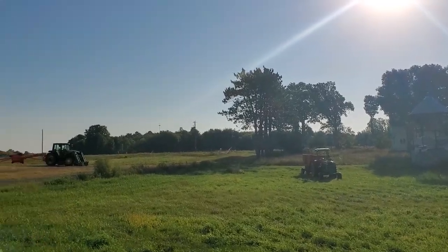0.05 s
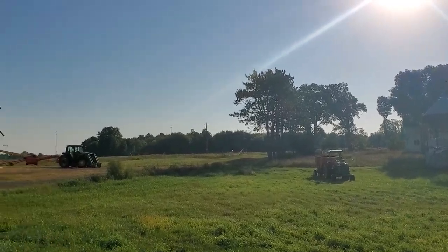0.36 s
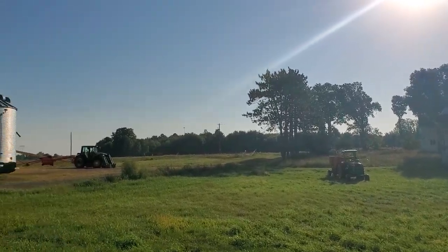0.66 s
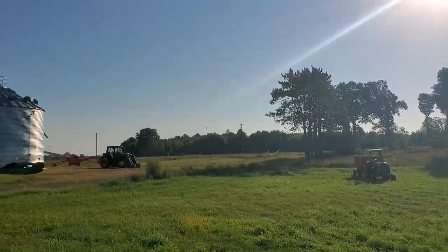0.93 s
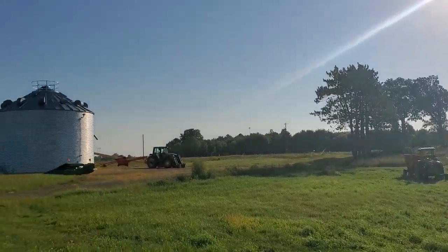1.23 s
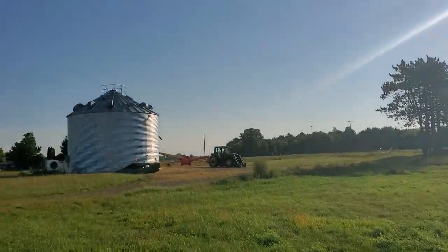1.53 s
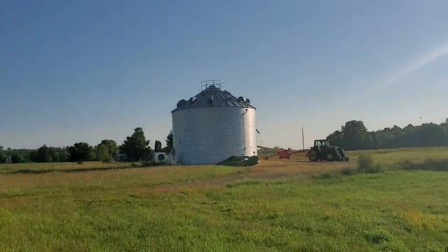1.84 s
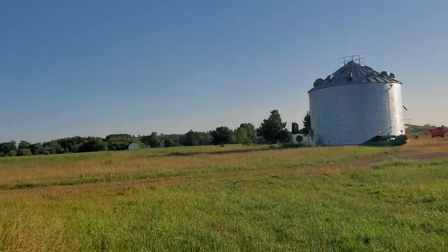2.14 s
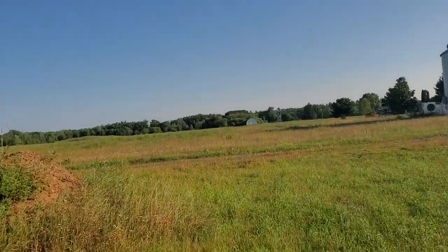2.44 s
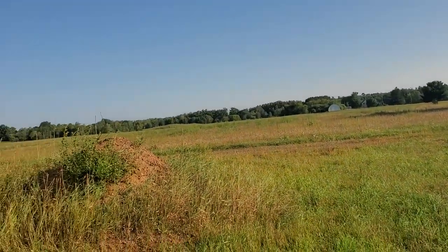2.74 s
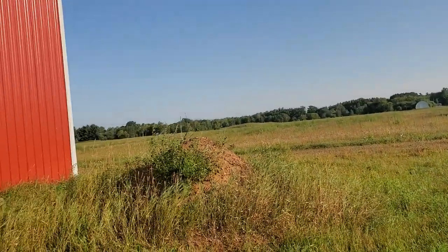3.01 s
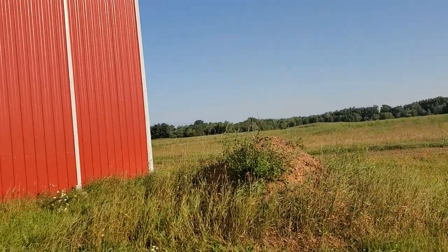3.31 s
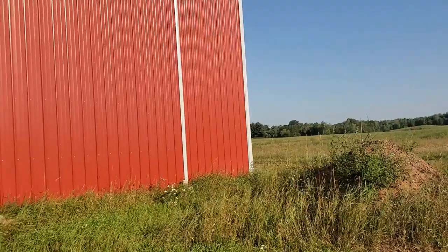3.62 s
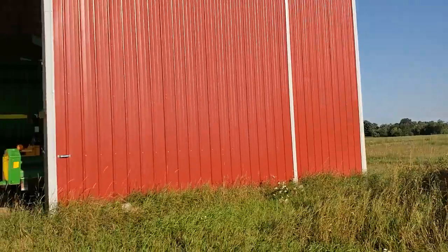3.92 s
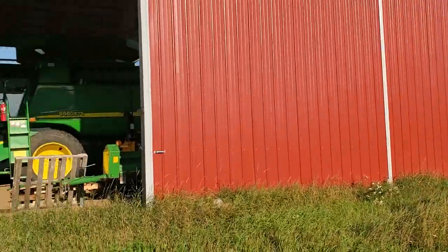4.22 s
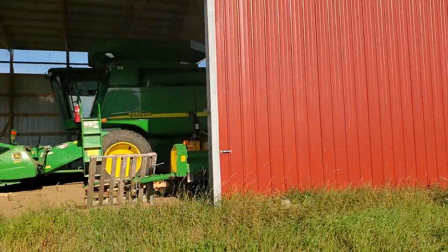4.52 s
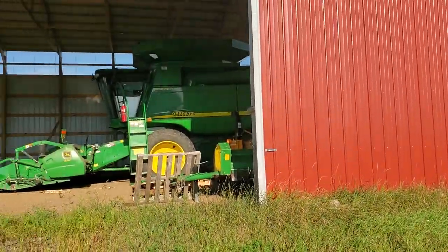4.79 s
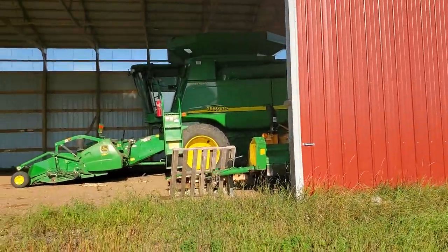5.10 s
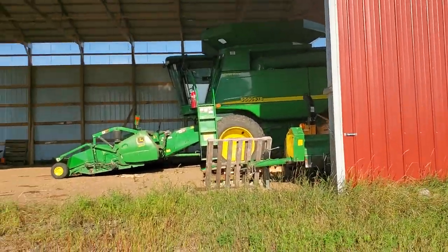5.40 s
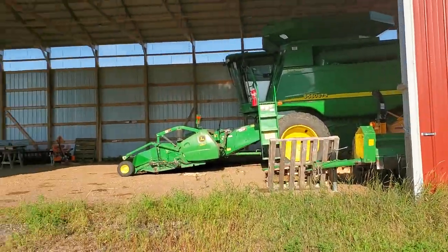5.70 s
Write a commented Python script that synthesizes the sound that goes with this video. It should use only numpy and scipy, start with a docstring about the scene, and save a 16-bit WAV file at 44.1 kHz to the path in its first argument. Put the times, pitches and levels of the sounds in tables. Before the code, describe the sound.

Crickets trill and katydids sizzle quietly across a summer field while wind buffets the microphone in short, deep bursts, the loudest sound here. During a lull, someone can be heard walking slowly through grass, with soft thuds, brushing blades and snapping stems. A twig splits underfoot and the wind picks up again. A faint drone like distant traffic lies behind it all.

```python
"""Gusts of wind rumble and thump as their eddies tumble over a phone's two microphone ports.
Whoever holds it walks slowly through summer grass on a farm: blades swish, stems crunch, a twig splits.
Crickets and katydids sing all around by stridulation, drawing a scraper over a toothed file on the wing.
Behind them lie the faint murmur of open country, a far drone and a thin, fading whine."""
import sys
import numpy as np
from scipy import signal
from scipy.fft import rfft, irfft, next_fast_len
from scipy.io import wavfile
from scipy.ndimage import uniform_filter1d

SR = 44100
rng = np.random.default_rng(int(sys.argv[2]) if len(sys.argv) > 2 else 0)


def inscribe(sig):
    """Save sig as 16-bit PCM at rate SR to the path in sys.argv[1].

    A 1-D sig is mono; a 2-D sig holds one channel per row.
    Samples are clipped to [-1, 1] before scaling.
    """
    pcm = np.round(np.clip(np.atleast_2d(sig).T, -1, 1) * 32767)
    wavfile.write(sys.argv[1], SR, pcm.astype(np.int16))


N = 262395
TIME = np.arange(N) / SR

# Gusts. Each row: arrival in seconds, hold in seconds, relative rumble level in dB,
# flutter relative to rumble in dB, left minus right rumble in dB.
GUSTS = [(0.107, .06, -50.5, 0.5, -30), (0.193, 0.024, -33.5, -.5, -5), (0.304, .25, -40, -3, -1),
         (.6, 0.03, -34.5, -11.5, 2.5), (0.674, 0.094, -38.5, -0.5, 2), (0.822, 0.098, -32.5, -11.5, 1.5),
         (0.946, .035, -36, 2, 0), (1.109, 0.13, -39.5, -11, -10), (1.36, 0.089, -44, -16, 0),
         (1.502, 0.15, -62.5, -14, -16.5), (1.889, 0.065, -56.5, -5.5, -24.5),
         (2.003, 0.033, -43, -12.5, -1), (2.124, 0.017, -45, -13, -7.5), (2.324, 0.064, -59, -26, 3),
         (2.47, 0.17, -64.5, -18, 17), (2.696, 0.24, -65.5, -17, -21), (2.996, 0.069, -56.5, -7.5, -30.5),
         (3.143, .055, -35, -5, -6), (3.231, 0.19, -40, -4, -10), (3.466, 0.064, -37, -7, -11),
         (3.611, 0.17, -47, -7.5, -21.5), (3.743, 0.23, -34.5, -9.5, 0.5), (4.064, 0.1, -33, -6.5, 1),
         (4.159, 0.091, -37.5, -3, 12), (4.328, .2, -35, -10, 1.5), (4.597, .045, -35.5, -7, 0),
         (4.685, .19, -53, -7, -19.5), (4.95, 0.15, -43, -13.5, -4), (5.155, 0.079, -35, -13.5, 5),
         (5.317, 0.1, -43.5, -10.5, -4.5), (5.555, 0.016, -46.5, -11, -7),
         (5.661, 0.17, -52.5, -10.5, -17.5), (5.813, 0.15, -40.5, -12, 0.5)]
# Spectra of large, middling and fine eddies. Each row: frequency in Hz, relative level in dB.
RUMBLE_SPECTRUM = [(10, -35), (25, -13.5), (45, -0.5), (70, 3), (100, -1), (140, -10), (200, -19),
                   (350, -39), (700, -69)]
FLUTTER_SPECTRUM = [(60, -12.5), (140, -3), (220, -2), (310, -3.5), (420, -14.5), (550, -24.5), (750, -44),
                    (1300, -67), (3000, -70), (8000, -95)]
FINE_SPECTRUM = [(150, -17), (330, 5), (440, 1.5), (560, -8.5), (700, -16.5), (900, -28), (1500, -45),
                 (3000, -60), (8000, -90)]
# Single large eddies. Each row: time in seconds, relative peak in dB, pitch in Hz.
BUFFETS = [(0.195, -20.5, 88), (0.471, -23, 160), (0.747, -19, 172), (0.907, -20, 89.6), (0.97, -25, 85.5),
           (1.119, -27.5, 277), (3.138, -25, 260), (3.398, -26.5, 306), (3.777, -17, 76.5),
           (3.925, -18.5, 86.5), (4.125, -20.5, 59.2), (4.449, -20.5, 119), (5.152, -22, 68),
           (5.21, -26.5, 51.1)]

# Steps. Each row: footfall, length of swing and time under load in seconds,
# then relative levels of crunch and hiss in dB.
STEPS = [(2.028, 0.14, 0.064, -57.5, -66), (2.54, 0.03, 0.039, -68.5, -71.5),
         (3.243, .01, 0.027, -55, -63.5), (3.75, .08, 0.15, -73.5, -79), (4.21, 0.069, 0.026, -75, -70),
         (4.54, .08, 0.044, -70.5, -71.5), (5.14, 0.23, 0.12, -61, -69), (5.375, .05, .1, -60.5, -85),
         (5.72, .05, 0.052, -64, -93), (5.86, 0.08, 0.12, -58.5, -64)]
# Grass stirring around the legs, most in the tall patch. Each row: time in seconds, relative level in dB.
GRASS_STIR = [(0, -79), (1.7, -81.5), (2.3, -85), (2.75, -81), (3.5, -75.5), (4.7, -77.5), (5.6, -77)]
# Spectra of crushed stems and brushed blades. Each row: frequency in Hz, relative level in dB.
STEM_SPECTRUM = [(200, -2.5), (540, 13.5), (820, -5.5), (1250, 5.5), (1700, 3), (2400, -5.5), (3200, -10),
                 (4200, -12.5), (7000, -19), (12000, -38)]
BLADE_SPECTRUM = [(1000, 11.4), (2500, 7.3), (4000, 6.7), (6000, 8.8), (9000, 6.8), (11000, 5.5),
                  (13000, 7.3), (16000, 8.3)]
# Soles meeting turf. Each row: start in seconds, peak in dB, pitch in Hz, decay time in seconds.
LANDINGS = [(2.032, -44, 700, 0.011), (2.046, -40.5, 590, 0.016), (2.541, -45, 590, 0.008),
            (2.566, -44.5, 606, 0.0076), (3.132, -35, 520, 0.0068), (3.185, -39, 490, 0.006),
            (5.13, -36.5, 490, 0.009), (5.149, -43, 520, 0.075)]
# Breaking stems. Each row: start in seconds, relative peak in dB, nominal pitch in Hz.
STEM_SNAPS = [(1.8354, -54.5, 960), (2.036, -46, 1180), (2.0609, -48, 1400), (2.0938, -49, 1070),
              (2.5265, -51.5, 1060), (2.5804, -47.5, 980), (3.1337, -51.5, 1400), (3.273, -55, 1380),
              (3.752, -57, 1330), (4.2167, -53.5, 1040), (4.515, -59, 1100), (5.327, -53, 1200),
              (5.3828, -49, 1420), (5.4381, -52, 1410), (5.4752, -55, 1750), (5.571, -48, 1310),
              (5.723, -59, 1650)]
# Stages of a twig's fracture. Each row: start in seconds, relative peak in dB.
TWIG_SPLITS = [(3.2385, -39), (3.2405, -40), (3.2425, -37), (3.245, -37)]
# The twig's modes. Each row: frequency in Hz, relative level in dB, seconds to decay by 60 dB.
TWIG_MODES = [(1420, -3, .012), (1880, 5, 0.012), (2310, -2, 0.021), (3000, -5.5, 0.013), (5030, -20, .003),
              (6600, -4, 0.0034), (8500, -9, 0.0041)]

# Trilling crickets. Each row: start in seconds, strokes per second, pitch in Hz,
# level relative to the nearest in dB, left minus right in dB.
TRILLS = [(.034, 12.54, 6020, 0, 2), (.026, 13.0, 6740, -2.5, 0), (.02, 15.5, 7330, -5, 1)]
# Chirps. Each row: start in seconds, pitch in Hz, relative level in dB.
CHIRPS = [(0.29, 4860, -67), (.65, 4920, -69), (1.109, 4880, -66), (1.245, 5450, -74), (1.6, 4900, -67.5),
          (2.055, 4890, -66.5), (2.529, 4900, -75), (2.94, 4950, -68), (4.68, 4900, -70)]
# A chirp's partials. Each row: multiple of the pitch, relative level in dB, left minus right in dB.
CHIRP_PARTIALS = [(1, -8, 13), (2, -13, -13)]
# Spectra of the insect choruses. Each row: frequency in Hz, relative level in dB.
FAR_CRICKET_SPECTRUM = [(4500, -27), (5400, -8), (6000, -5), (6600, -1.5), (7250, -1.5), (7700, -4),
                        (8200, -10.5), (8800, -30), (10500, -55)]
FIELD_CRICKET_SPECTRUM = [(3800, -18), (4300, -5.5), (4850, 5), (5100, 5), (5400, -9.5), (6200, -17.5)]
KATYDID_SPECTRUM = [(10000, -38), (12700, -31), (13300, -6), (14000, -5), (15000, -3), (16000, -5)]
# Choruses as the phone turns. Each row: time in seconds, relative level in dB, leftward bias in dB.
FAR_CRICKET_COURSE = [(0.1, -71, 5), (0.3, -68, 5.5), (2.51, -72.5, 2), (2.85, -73, 5), (3.28, -68.5, 3),
                      (3.84, -68, 13.0), (5.04, -70, 19), (5.75, -71, 19)]
KATYDID_COURSE = [(0.1, -69, 2.0), (0.65, -66, 1.5), (1.07, -71.5, 3.6), (1.66, -74, 1.5), (1.89, -76, 4.5),
                  (2.29, -75, 0.5), (3.7, -72, 2.0), (4.29, -70.5, 23), (5.75, -76, 13)]

# A far drone, like traffic. Each row: time in seconds, relative level in dB.
DRONE_COURSE = [(0, -59.5), (1.3, -60), (1.7, -54.5), (2.0, -55.5), (2.3, -80), (2.9, -63), (3.6, -58.5),
                (5.95, -91)]
# Background spectra. Each row: frequency in Hz, relative level in dB.
MURMUR_SPECTRUM = [(20, -12), (70, -9), (160, -21), (300, 3.5), (500, 3), (780, -8.5), (1050, -6),
                   (1500, -12.5), (2200, -21.5), (4000, -29), (9000, -21), (11000, -30.5), (16000, -28)]
DRONE_SPECTRUM = [(250, -26), (400, -2.5), (510, 3), (600, -3), (750, -9.0), (1100, -25.5), (2000, -34)]
WHINE_SPECTRUM = [(900, -28), (965, -14), (985, -29), (1005, 28), (1070, -31)]


def wind(breeze_db=-74.5, gust_db=-45, steepness=0.28):
    """Turbulent pressure: the finest eddies grow fastest, so strong gusts sound brighter."""
    large_power = (undb(breeze_db) * pan(-14.5)) ** 2  # light air reaches mainly the right port
    middle_power = 0
    for start, hold, db, flutter_db, side_db in GUSTS:
        power = swell(start, hold, rise_db_per_s=446, fall_db_per_s=385) ** 2
        large_power = large_power + power * (undb(db) * pan(side_db)) ** 2
        middle_power += power * (undb(db + flutter_db) * pan(0.094 * side_db - 1.3)) ** 2
    fine_power = middle_power * (middle_power / undb(gust_db) ** 2) ** steepness
    rumble = turbulence(RUMBLE_SPECTRUM, shared=0.22, patchy_db=4.0, rate=45) * np.sqrt(large_power)
    flutter = turbulence(FLUTTER_SPECTRUM, shared=0.11, patchy_db=5.0, rate=70) * np.sqrt(middle_power)
    fine = turbulence(FINE_SPECTRUM, shared=0.26, patchy_db=5.5, rate=80) * np.sqrt(fine_power)
    return rumble * undb(0.2) + flutter * undb(0.78) + fine * undb(-7.5)


def turbulence(spectrum, shared, patchy_db, rate):
    """Intermittency: eddies come in clumps, partly different at each port, while mean power holds."""
    clumps = wander(rate) + np.array([wander(rate), wander(rate)])
    eddies = colour(noise_pair(shared) * undb(patchy_db * clumps), spectrum)
    power = uniform_filter1d(np.mean(eddies ** 2, axis=0), size=3500)
    return eddies / np.sqrt(power + 1e-6)


def buffets(width_cycles=0.82, stagger_s=0.0022):
    """Convection: a passing eddy pushes and then sucks, reaching one port just before the other."""
    out = np.zeros((2, N))
    t = np.arange(-SR // 40, SR // 40) / SR
    for when, db, hz in BUFFETS:
        delays = stagger_s * rng.standard_normal((2, 1))
        phase, side = rng.standard_normal(2)
        cycles = hz * (t - delays)
        pressure = np.sin(2 * np.pi * cycles + phase) * np.exp(-(cycles / width_cycles) ** 2)
        add(out, when + t[0] + 0.0037, pressure * undb(db - 4) * pan(4.1 * side))
    return out


def footsteps(swing_rise_db=12.5, slide_share=0.22):
    """Friction and buckling: each foot brushes hissing blades, then crushes a mat of stems."""
    press, brush = 0, 0
    for when, swing, load, crunch_db, hiss_db in STEPS:
        # stems take the weight quickly and spring back slowly
        press += swell(when, load, rise_db_per_s=593, fall_db_per_s=145) * undb(crunch_db)
        brush += swell(when, slide_share * load, swing_rise_db / swing, fall_db_per_s=85) * undb(hiss_db)
    stems = (crackle(rate=1200, spread_db=3.5) + 0.25 * noise_pair(0.066)) * undb(2.1 * wander(130))
    crunch = colour(stems, STEM_SPECTRUM) * press * undb(-1) * pan(1.1)
    blades = (crackle(rate=2500, spread_db=2.0) + noise_pair(0)) * undb(wander(40))
    stir = undb(curves(GRASS_STIR)[0])
    hiss = colour(blades, BLADE_SPECTRUM) * np.hypot(brush, stir) * undb(4) * pan(5.5)
    return crunch + hiss


def crackle(rate, spread_db):
    """A Poisson process: stems click independently, a few louder than the rest, each from its own side."""
    hits = rng.random(N) < rate / SR
    sizes = undb(spread_db * np.minimum(rng.exponential(size=N), 3))
    signs = rng.choice([-1, 1], N)
    return unit(hits * sizes * signs * pan(6 * rng.standard_normal(N)))


def landings():
    """Damped impact: soles scuff dully onto the turf."""
    out = np.zeros((2, N))
    for start, db, hz, decay_s in LANDINGS:
        add(out, start, fibre_burst(hz, width=0.65, decay_s=decay_s, apart=0.44) * undb(db))
    return out


def stem_snaps():
    """Brittle fracture: single dry stems break with a short woody crack."""
    out = np.zeros((2, N))
    for start, db, hz in STEM_SNAPS:
        crack = fibre_burst(.92 * hz, width=.72, decay_s=.0035, apart=.7)
        add(out, start, crack * undb(db + 2) * pan(2.5))
    return out


def fibre_burst(hz, width, decay_s, apart):
    """Exponential decay: yielding fibres give a dying band of noise around one pitch, with peak 1."""
    t = np.arange(SR // 4) / SR
    fibres = rng.standard_normal(len(t)) + apart * rng.standard_normal((2, len(t)))
    band = signal.butter(3, [hz / (1 + width), min(hz * (1 + width), SR / 3)], "band", fs=SR)
    burst = signal.lfilter(*band, fibres * np.exp(-t / decay_s))
    return burst / np.abs(burst).max()


def twig():
    """Modal ringing: each split strikes the same woody modes, a little differently for each port."""
    out = np.zeros((2, N))
    t = np.arange(SR // 20) / SR
    for start, db in TWIG_SPLITS:
        ring = 0
        for hz, mode_db, t60 in TWIG_MODES:
            envelope = undb(mode_db + 2 * rng.standard_normal((2, 1)) - 60 * t / t60)
            ring += envelope * np.sin(2 * np.pi * (hz * t + rng.random()))
        add(out, start, ring / np.abs(ring).max() * undb(db - 2) * pan(5.1))
    return out


def trilling_crickets(turn_s=1.85, fade_db_per_s=10):
    """Directivity: three crickets trill close by and fade once the phone turns away."""
    nearest_db = -66.3 - fade_db_per_s * np.maximum(TIME - turn_s, 0)
    return sum(trill(start, rate, hz) * undb(nearest_db + db) * pan(side_db)
               for start, rate, hz, db, side_db in TRILLS)


def chirping_crickets(spacing_s=.046, growth_db=1.3):
    """Harmonic pulses: wing strokes come in swelling threes, with an octave above the note."""
    out = np.zeros((2, N))
    for start, hz, db in CHIRPS:
        for k in range(3):
            for multiple, partial_db, side_db in CHIRP_PARTIALS:
                stroke = wing_stroke(multiple * hz, length_s=0.029, droop=0.156)
                gain = undb(db + partial_db + k * growth_db) * pan(side_db)
                add(out, start + k * spacing_s, stroke * gain)
    return out


def trill(start, rate, hz):
    """A pulse train: one cricket closes its wings over and over, each stroke a little different."""
    out = np.zeros(N)
    for k, (late, sharp, loud) in enumerate(rng.standard_normal((128, 3))):
        when = start + k / rate + .0015 * late
        if when < N / SR:
            stroke = wing_stroke(hz * (1 + .003 * sharp), length_s=.025, droop=.1)
            add(out, when, stroke * undb(1.8 * loud))
    return out


def wing_stroke(hz, length_s, droop):
    """Stridulation: a scraper crosses the uneven teeth of the wing's file and slows, so the note sags."""
    progress = np.linspace(0, 1, int(length_s * SR))
    unevenness = .04 * rng.standard_normal(len(progress))
    tooth_hz = hz * (1 - droop * progress ** 2 + unevenness)
    return np.sin(2 * np.pi * np.cumsum(tooth_hz) / SR) * np.sin(np.pi * progress)


def far_crickets(count=9):
    """Incoherent summation: crickets, each with its own pitch, pace and side, merge into a shimmer."""
    db, side_db = curves(FAR_CRICKET_COURSE)
    voices = 0
    for hz, (when, pace, side) in zip(np.linspace(6400, 7600, count), rng.random((count, 3))):
        voices += trill(.07 * when, 12 + 4 * pace, hz) * pan(8 * (side - .5))
    haze = colour(noise_pair(0.032), FAR_CRICKET_SPECTRUM) * undb(0.85 * wander(25))
    return (.7 * unit(voices) + haze) * undb(db + 0.26) * power_pan(side_db + 6.5)


def field_crickets(throb_hz=31.5):
    """Amplitude modulation: larger crickets throb at a lower pitch, three trills among them."""
    throb = 1 + .25 * np.sin(2 * np.pi * throb_hz * TIME)
    voices = unit(trill(.01, 14.3, 5350) + trill(.03, 17.1, 5050) + trill(.02, 11.2, 4800))
    haze = colour(noise_pair(0.021), FIELD_CRICKET_SPECTRUM)
    return (haze * throb + 0.26 * voices) * undb(-82.5 + wander(14)) * pan(22.2)


def katydids():
    """Band-limited noise: many katydids blend into a flickering sizzle above the crickets."""
    db, side_db = curves(KATYDID_COURSE)
    sizzle = colour(noise_pair(.05), KATYDID_SPECTRUM)
    return sizzle * undb(db + 3.2 + 1.5 * wander(49)) * power_pan(side_db)


def open_country():
    """Ambient noise: a broad murmur swells slowly, a drone comes and goes, and a narrow whine fades."""
    murmur = colour(noise_pair(0.18), MURMUR_SPECTRUM) * undb(-65.5 + 1.36 * wander(3.115))
    drone = colour(noise_pair(0.57), DRONE_SPECTRUM) * undb(curves(DRONE_COURSE)[0] - 9.5)
    whine = colour(noise_pair(0.13), WHINE_SPECTRUM) * undb(-76 - 11 * TIME)
    return murmur + drone + whine


def undb(db):
    """The decibel scale: 20 dB is a tenfold amplitude."""
    return 10 ** (np.asarray(db) / 20)


def unit(x):
    """Normalisation to rms 1."""
    return x / np.sqrt(np.mean(x ** 2) + 1e-20)


def curves(table):
    """Linear interpolation of a table's columns in time."""
    times, *columns = np.transpose(table)
    return [np.interp(TIME, times, column) for column in columns]


def swell(when, hold, rise_db_per_s, fall_db_per_s):
    """An exponential envelope: it reaches 1 at the given time, holds and dies away."""
    before, after = np.maximum(when - TIME, 0), np.maximum(TIME - when - hold, 0)
    return undb(-rise_db_per_s * before - fall_db_per_s * after)


def pan(db):
    """A level difference as left and right gains."""
    return undb(np.array([[1], [-1]]) * db / 2)


def power_pan(db):
    """A level difference at constant total power."""
    gains = pan(db)
    return gains / np.sqrt(np.mean(gains ** 2, axis=0))


def colour(x, spectrum):
    """Spectral shaping by (Hz, dB) points, at rms 1."""
    hz, db = np.transpose(spectrum)
    size = next_fast_len(N)
    bin_hz = np.maximum(np.arange(size // 2 + 1) * SR / size, 1)
    gains = undb(np.interp(np.log(bin_hz), np.log(hz), db))
    return unit(irfft(rfft(x, size) * gains, size)[..., :N])


def noise_pair(shared):
    """Partial coherence: noise at two ports with a fraction of its power in common."""
    common, own = rng.standard_normal(N), rng.standard_normal((2, N))
    return np.sqrt(shared) * common + np.sqrt(1 - shared) * own


def wander(rate):
    """Random modulation at rms 1, through `rate` new values a second."""
    knots = rng.standard_normal(4096)
    return unit(np.interp(TIME * rate, np.arange(len(knots)), knots))


def add(out, start_s, sound):
    """Superposition of a short sound on a longer one."""
    start = max(int(start_s * SR), 0)
    room = max(min(sound.shape[-1], N - start), 0)
    out[..., start:start + room] += sound[..., :room]


def scene():
    """Superposition: the pressures of wind, feet, insects and open country add."""
    air = wind() + buffets()
    feet = footsteps() + landings() + stem_snaps() + twig()
    insects = trilling_crickets() + chirping_crickets() + far_crickets() + field_crickets() + katydids()
    return air + feet + insects + open_country()


def record(dry):
    """Limited bandwidth: the phone cuts off the highest treble."""
    cutoff_hz = 15750
    return signal.sosfilt(signal.ellip(12, .2, 80, cutoff_hz, fs=SR, output="sos"), dry)


dry = scene()
out = record(dry)
inscribe(out)
```